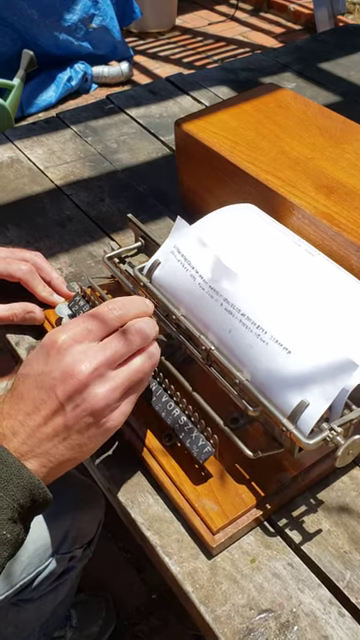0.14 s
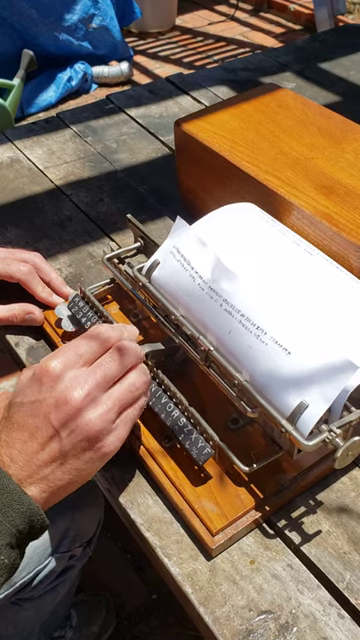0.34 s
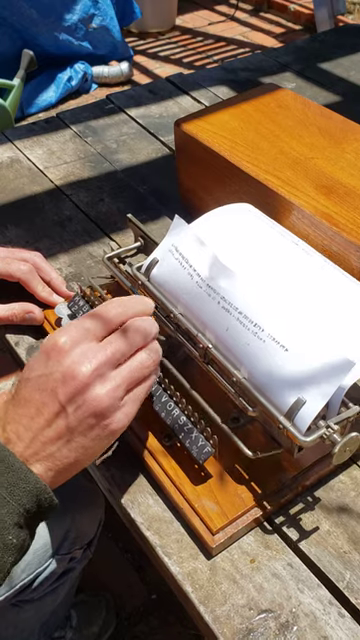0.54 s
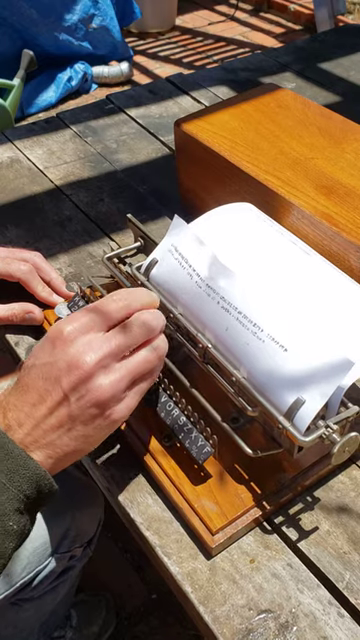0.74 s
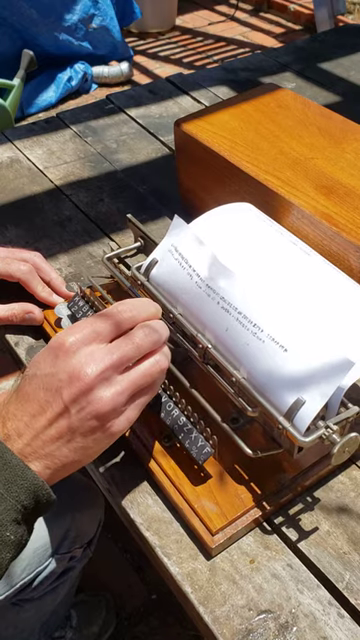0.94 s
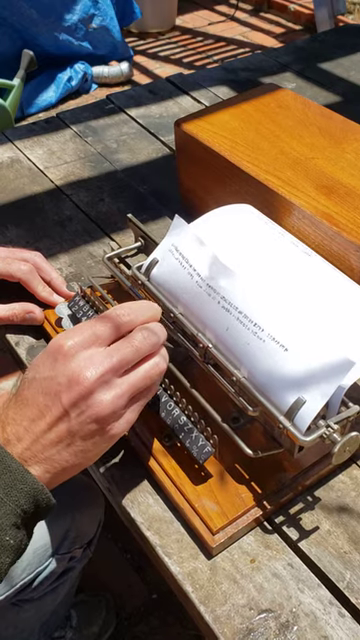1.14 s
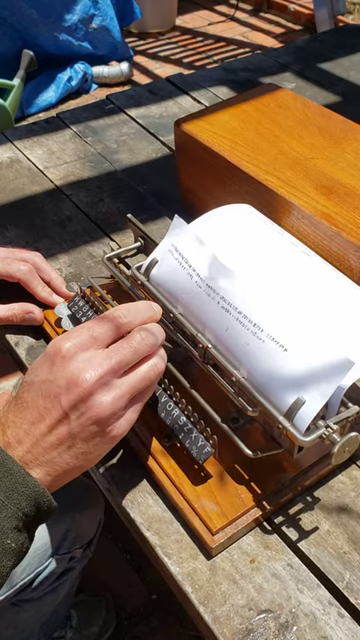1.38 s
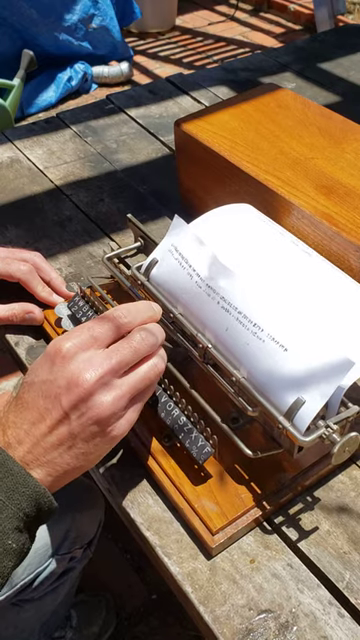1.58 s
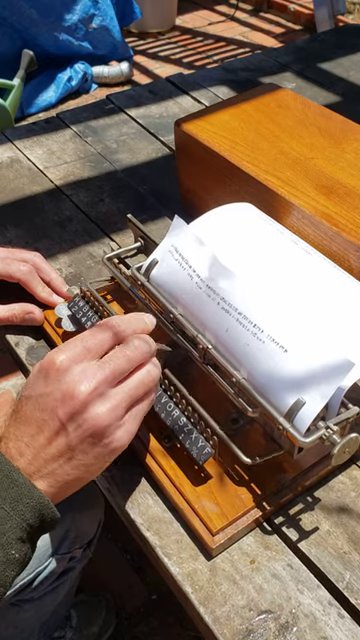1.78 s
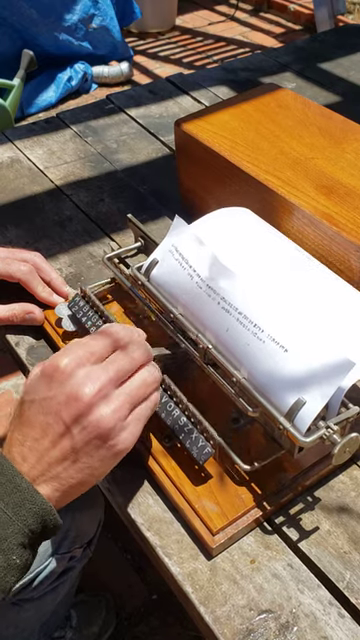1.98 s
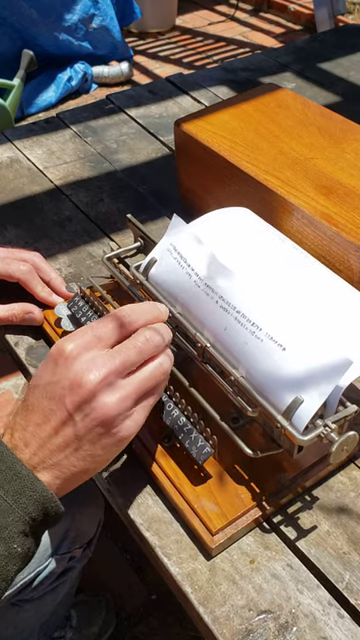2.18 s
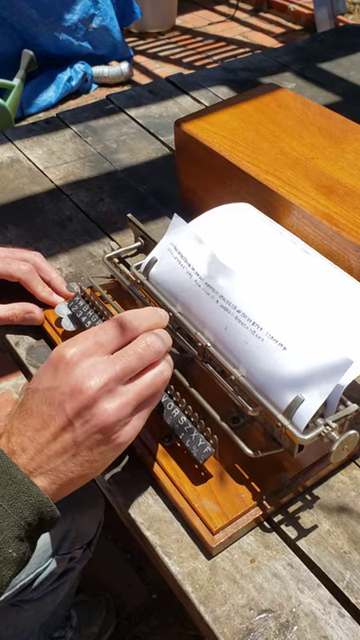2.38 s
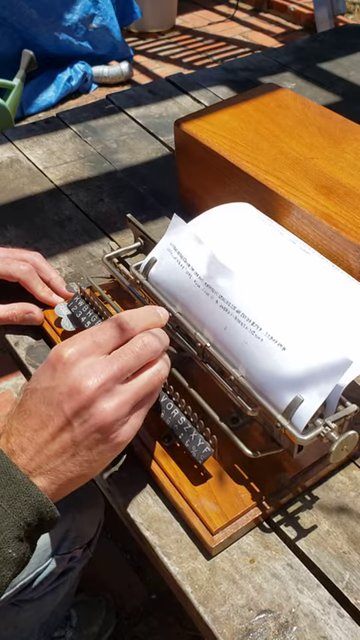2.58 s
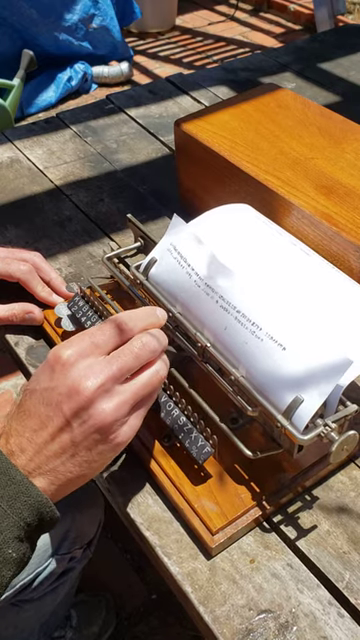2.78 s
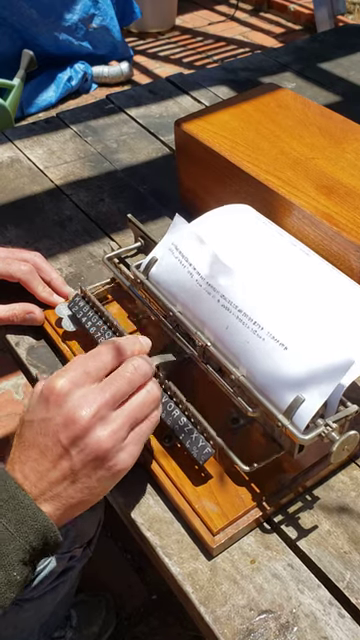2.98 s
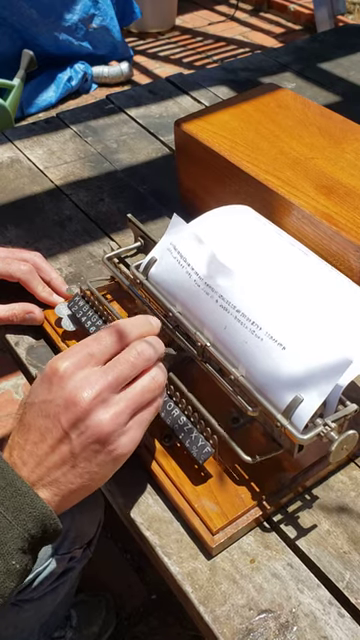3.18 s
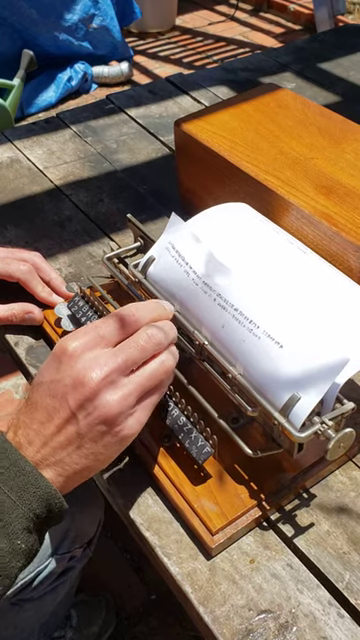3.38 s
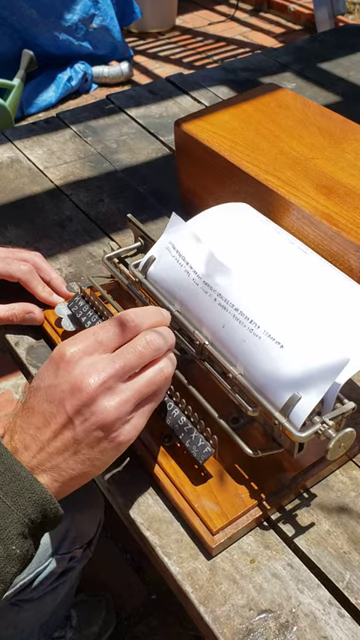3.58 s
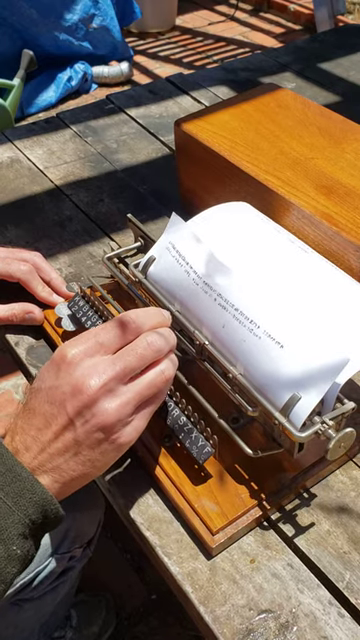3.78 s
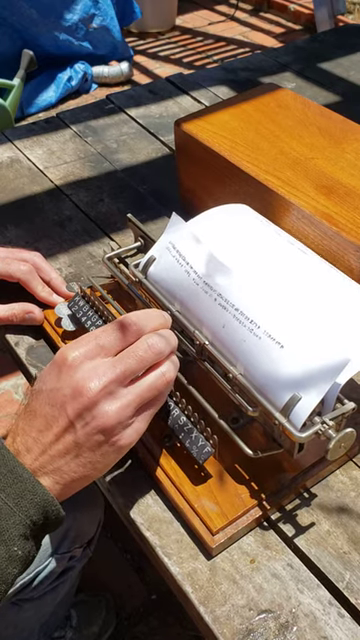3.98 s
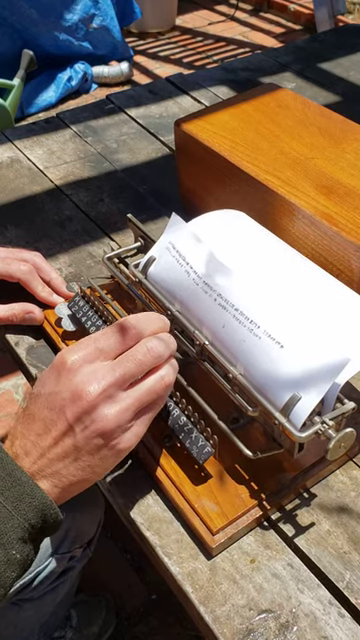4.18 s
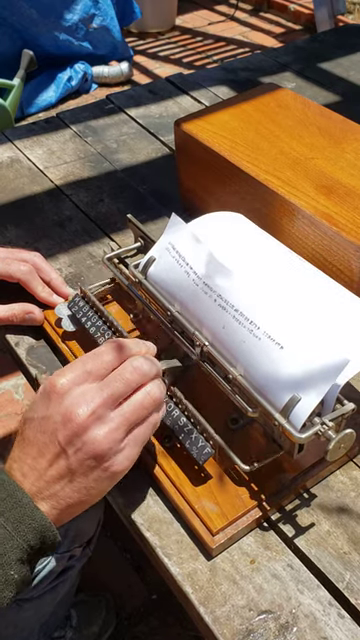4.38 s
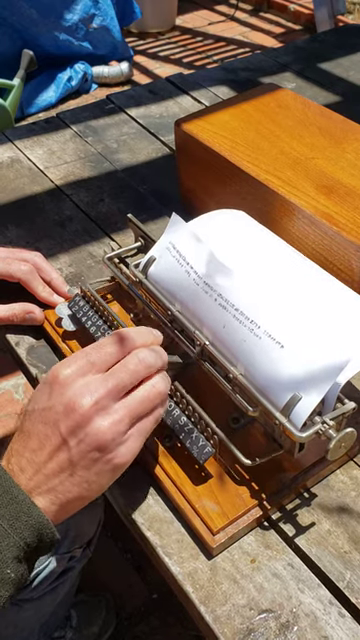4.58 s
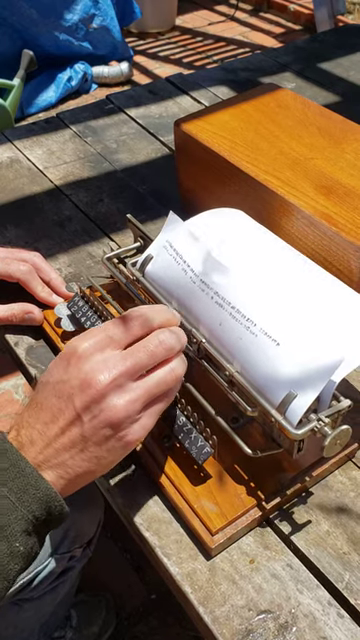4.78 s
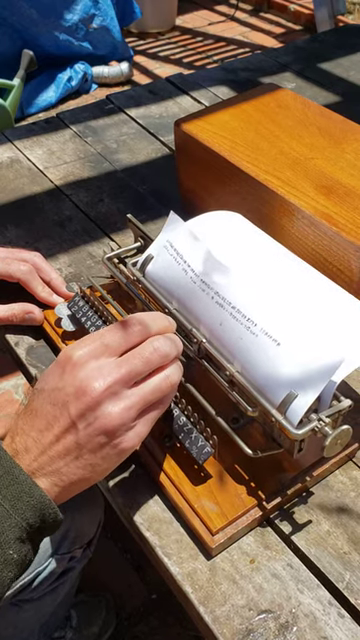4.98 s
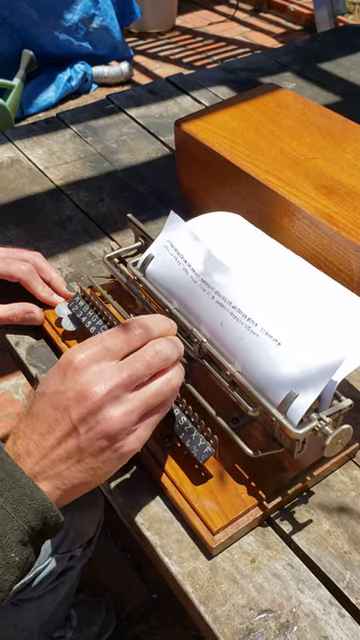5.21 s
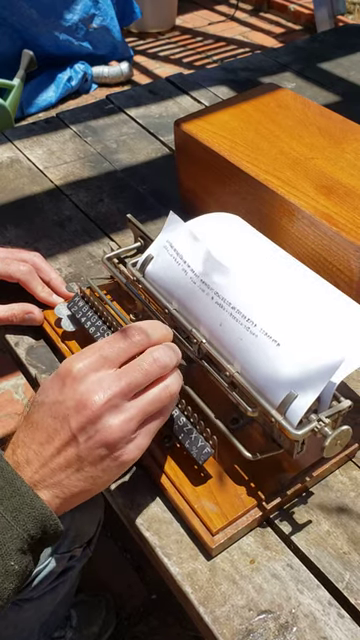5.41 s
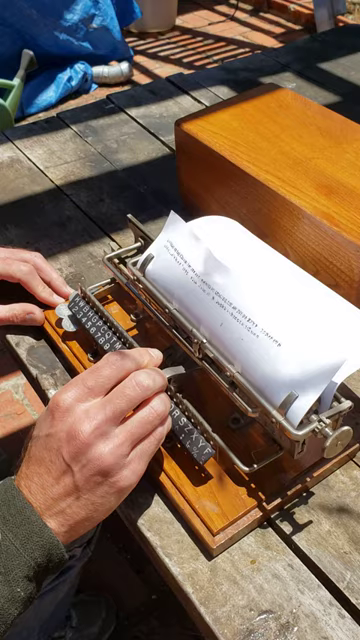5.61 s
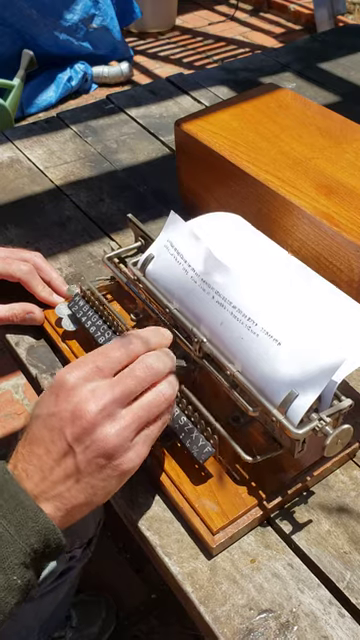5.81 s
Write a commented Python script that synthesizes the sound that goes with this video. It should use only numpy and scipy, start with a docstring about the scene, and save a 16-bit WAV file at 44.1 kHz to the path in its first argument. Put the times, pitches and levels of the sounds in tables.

```python
"""A faint tick, then the clack of an old index typewriter: five characters, typed on a wooden table
outdoors, close to a stereo pair. In each stroke the pointer finds its notch, the lever knocks in its
guide, the feed pawl catches, the type hits the platen and thumps the table, the carriage steps on and
the lever snaps back against its stop. A spring and a steel part ring on. Two faint squeaks follow the
first stroke; behind it all lie the rumble and hiss of open air and an engine far off."""
import sys
import numpy as np
from scipy import signal
from scipy.fft import rfft, irfft
from scipy.io import wavfile
from scipy.ndimage import uniform_filter1d

SR = 44100
rng = np.random.default_rng(int(sys.argv[2]) if len(sys.argv) > 2 else 0)


def output_pcm(signal):
    """Save a mono or channel-first signal as 16-bit PCM at the path in sys.argv[1].

    Samples are clipped to [-1, 1] before scaling.
    """
    pcm = np.clip(np.atleast_2d(signal).T, -1, 1) * 32767
    wavfile.write(sys.argv[1], SR, np.round(pcm).astype(np.int16))


N = 257984

# the pointer finds its notch: t/s, level/dB, brightness/(dB per octave)
POINTER_TICKS = [(0.1843, -53, -2.5), (0.613, -50, -2), (1.7022, -52, -2), (2.3795, -57, -4.5),
                 (2.8606, -45, 0.2), (4.2435, -48.5, -.5), (5.405, -47, 1.5)]
# the descending lever touches its guide: t/s, level/dB, length of the slide/s
LEVER_TOUCHES = [(0.2513, -48, 0.032), (2.9057, -55, 0.073), (4.266, -50.5, 0.088), (5.4624, -46, 0.034)]
# the lever knocks in its guide: t/s, level/dB
LEVER_KNOCKS = [(0.2884, -24), (1.8191, -30.5), (2.9634, -28.5), (4.3684, -31.5), (5.5636, -38)]
# the feed pawl drops over a tooth of the rack: t/s, level/dB
PAWL_CATCHES = [(0.2966, -21), (1.8381, -18.5), (2.9654, -21.5), (4.3804, -23.5), (5.5687, -25)]
# the type lands on the platen: t/s, level/dB, bounce gap/s, loss per bounce/dB, steel ring/dB
TYPE_BLOWS = [(0.3296, -17.5, 0.007, 6.5, -80.5), (1.8702, -18.5, 0.0063, 9.5, -84),
              (3.0045, -19.5, 0.0049, 10, -64), (4.4269, -19.5, .0076, 5, -72.5),
              (5.6132, -18.5, .008, 2.7, -87)]
# the carriage steps on: t/s, click/dB, scrape of the rising lever/dB
CARRIAGE_STEPS = [(.468, -25, -32), (2.015, -26, -34), (3.141, -28.5, -42.5), (4.5759, -25, -31.5),
                  (5.7551, -29, -35)]
# the lever hits its stop: t/s, level/dB, length/s, brightness/(dB per octave), spring ring/dB
LEVER_SNAPS = [(0.5129, -11, .0036, 0.5, -63), (2.0599, -10, 0.0034, 0, -59),
               (3.1973, -13, 0.0038, 0.6, -68.5), (4.6280, -15, 0.0049, 1.2, -70.5),
               (5.8170, -14, 0.0034, 0.2, -75.5)]
# faint squeaks: t/s, length/s, f/Hz, width of the waver/Hz, level/dB
SQUEAKS = [(0.902, 0.08, 10330, 90, -69), (1.384, 0.083, 2760, 260, -76)]

# colour of each contact, and of the wooden base and table: f/Hz, gain/dB
GUIDE_TONE = [(100, -6), (500, -4), (850, 1.5), (1130, 5.5), (1450, -3.5), (2200, -6), (2820, 5),
              (3400, -1), (4500, -6.5), (7000, -7.5), (10000, -17.5), (12500, -14.5), (16000, -17.5)]
CATCH_TONE = [(100, -10), (400, -3), (550, -5), (1200, -3.5), (2000, -7), (2650, -2.5), (3150, 5.5),
              (3500, -1.5), (4700, 1.5), (7000, -3), (10000, -5.5), (11500, 2.5), (16000, -1.5)]
PLATEN_TONE = [(100, 3.5), (420, -1.5), (600, -8), (820, 5), (1900, 1.5), (2900, 9.5), (4200, 3),
               (6500, -1.5), (9000, -6.5), (12000, -1.5), (16000, -7.5)]
SCRAPE_TONE = [(100, 0), (420, -7.5), (620, 5.5), (1100, -6.5), (1700, -5), (2000, -6.5), (3500, -2.5),
               (6500, -13), (10000, -11.5), (11500, -10), (16000, -17)]
STOP_TONE = [(100, -13.5), (500, -18.5), (950, -9.5), (1400, -0.5), (1850, 0), (2450, 13.5), (2750, 12.5),
             (3120, 15), (3450, 10), (4200, 7.5), (5700, 1), (7500, 4.5), (8700, -4), (11500, 4),
             (16000, 1.5)]
WOOD_TONE = [(25, -22), (50, -4.5), (110, 6), (200, 1), (255, -11), (313, 1.5), (355, -7), (408, -0.5),
             (490, -8), (658, -3), (720, -11.5), (798, -6.5), (1000, -15), (2200, -22.5), (6000, -52)]
# resonances of the metal frame: f/Hz, width/Hz, gain/dB
FRAME_MODES = [(1070, 290, 3), (1330, 32, 2.5), (1670, 180, 5), (2025, 37, 7.5), (2340, 52, -4.5),
               (2765, 600, 5.5), (3080, 160, -0.5), (3920, 54, 5), (4430, 80, 1.5), (5070, 120, 3.5),
               (6770, 130, 3), (11646, 470, 2.5), (13590, 210, 5), (14500, 180, 4), (15600, 290, 3)]
# long-ringing parts: f/Hz, spread of partials to either side/Hz, gain/dB, t60/s
SPRING_MODES = [(6000, 160, 1.5, 0.98), (6060, 260, -4.5, 1), (2820, 170, -3.5, .22)]
STEEL_MODES = [(3488, 0, 0, 3.3), (1620, 0, -15, 2.5)]
# decay of the machine and its surroundings: f/Hz, t60/s
TAIL_T60 = [(200, 0.43), (1200, 0.39), (3000, 0.27), (7000, .28), (15000, 0.27)]
# colour of the rattle and the reflections: f/Hz, gain/dB
TAIL_TONE = [(300, 1.5), (1300, 3.5), (2800, -6), (4500, 1), (8000, 0), (15000, -7.5)]

# the machine sits nearer the left microphone: f/Hz, left minus right/dB
MIC_BALANCE = [(60, 5), (250, 2), (600, 6.5), (1300, 7), (2600, 5.5), (4400, 5), (8000, 4), (14000, 7)]
# the right microphone hears it later: f/Hz, lag/samples
MIC_LAG = [(900, 3.9), (2700, 1.7), (4400, 2.7), (12000, 2.5)]
# likeness of left and right, for the machine and for the open air: f/Hz, coherence (0 to 1)
MIC_COHERENCE = [(100, 0.97), (900, 0.8), (2700, 0.72), (5000, 0.39), (9000, 0.48), (15000, .75)]
AIR_COHERENCE = [(60, .84), (180, .9), (550, .67), (1650, .1), (15000, .03)]
# spectrum of the open air: f/Hz, relative density/dB
AIR_SPECTRUM = [(20, -33), (45, -4.5), (82, -2), (200, -15.5), (290, -21.5), (380, -24), (700, -34),
                (1250, -42), (1600, -40.5), (2000, -45.5), (3500, -50.5), (6500, -53), (8700, -63),
                (14000, -57)]
# the background swells: t/s, rumble/dB, tilt/dB (half lifts the hiss, half lowers the air's rumble)
AIR_SWELL = [(0, -5, 3), (.6, -.5, 6), (1.6, -2.5, 3), (2.4, -3, 1.3), (4.1, -2.5, -1), (4.5, 1.5, 4.5),
             (5.3, -0.5, 0.5), (5.85, 7.5, 13)]


def typewriter(rattle_db=-13, rattle_t60=0.065, tail_db=-18, crossfeed=0.51):
    """Five strokes at close range, with the short rattle of loose parts and the longer ring around them."""
    direct = pointer() + lever_down() + pawl() + platen() + carriage() + lever_stop()
    out = direct + amp(rattle_db) * tail(direct, [(1000, rattle_t60)], rise_s=0.0009)
    out += amp(tail_db) * tail(direct + crossfeed * direct[::-1], TAIL_T60, rise_s=0.0051)
    for s, *_, steel_db in TYPE_BLOWS:
        out += ringing(STEEL_MODES, s, steel_db, rise_s=0.18)
    for s, *_, spring_db in LEVER_SNAPS:
        out += ringing(SPRING_MODES, s, spring_db, rise_s=0.003)
    return out + table_thump()


def pointer(length_s=0.0027):
    """The pointer ticks into the notch of the next character."""
    out = np.zeros((2, N))
    for s, db, bright in POINTER_TICKS:
        add(out, s, contact(db, length_s, CATCH_TONE, bright, shape=1.1, grit=0.4))
    return out


def lever_down(touch_s=0.006, knock_s=0.0083):
    """The descending lever touches its guide, rubs along it and knocks against it."""
    out = lever_rub()
    for s, db, _ in LEVER_TOUCHES:
        add(out, s, contact(db, touch_s, GUIDE_TONE, bright=-3.6, shape=1.1, grit=0.55))
    for s, db in LEVER_KNOCKS:
        add(out, s, contact(db, knock_s, GUIDE_TONE, bright=0.8, shape=0.67, grit=0.54))
    return out


def lever_rub(db=-63.5, slips_per_s=1100, uneven_db=3, size=4096):
    """Tiny irregular slips tap the guide while the lever slides."""
    hz, out = np.fft.rfftfreq(size, 1 / SR), np.zeros((2, N))
    guide = irfft(mic_pair(np.array([[1], [0]]) * causal(curve(GUIDE_TONE, hz)), hz))
    for s, _, length in LEVER_TOUCHES:
        chance, strength = rng.random(size * 2), rng.standard_normal(size * 2)
        slips = (chance < slips_per_s / SR) * amp(uneven_db * strength) * np.sign(strength)
        slide = unit_rms(slips[:round(length * SR)])
        add(out, s, amp(db) * signal.fftconvolve(slide[None], guide, axes=1))
    return out


def pawl(catch_s=0.0045, drag_s=0.018, drag_after_s=0.029, drag_db=-20):
    """The feed pawl drops over a tooth, then drags dully along the rack."""
    out = np.zeros((2, N))
    for s, db in PAWL_CATCHES:
        add(out, s, contact(db, catch_s, CATCH_TONE, bright=-0.6, shape=0.75, grit=0.18))
        drag = contact(db + drag_db, drag_s, CATCH_TONE, bright=-8, shape=1.0, grit=0.2)
        add(out, s + drag_after_s, drag)
    return out


def platen(blow_s=0.0035, bounces=7, bounce_s=0.0024, first_bounce_db=-3.5, jitter_s=0.0008):
    """The type lands and bounces at nearly even gaps, dying away with slightly uneven force."""
    out = np.zeros((2, N))
    for s, db, gap, loss_db, _ in TYPE_BLOWS:
        add(out, s, contact(db, blow_s, PLATEN_TONE, bright=-0.87, shape=0.55, grit=0.3))
        for k, (jitter, uneven) in enumerate(rng.uniform(-0.92, 1, (bounces, 2))):
            bounce_db = db + first_bounce_db - k * loss_db + 0.5 * uneven
            bounce = contact(bounce_db, bounce_s, PLATEN_TONE, bright=2.8, shape=0.83, grit=0.25)
            add(out, s + (k + 1) * gap + jitter * jitter_s, bounce)
    return out


def carriage(lift_s=0.011, lead_s=0.008, click_s=0.0014, slide_s=0.0115, lag_s=0.0108, slide_db=-8.5):
    """The rising lever scrapes, the carriage lets go with a click and slides on by one place."""
    out = np.zeros((2, N))
    for s, db, lift_db in CARRIAGE_STEPS:
        lift = contact(lift_db, lift_s, SCRAPE_TONE, bright=1, shape=0.63, grit=0.44)
        click = contact(db, click_s, SCRAPE_TONE, bright=-1.2, shape=0.73, grit=0.3)
        slide = contact(db + slide_db, slide_s, SCRAPE_TONE, bright=0.45, shape=0.86, grit=0.44)
        add(out, s - lead_s, lift)
        add(out, s, click)
        add(out, s + lag_s, slide)
    return out


def lever_stop():
    """The lever snaps against its stop: the force stays up and then ends at once."""
    out = np.zeros((2, N))
    for s, db, length, bright, _ in LEVER_SNAPS:
        add(out, s, contact(db, length, STOP_TONE, bright, shape=5.5, grit=0.087))
    return out


def contact(db, length_s, tone, bright, shape, grit, size=4096):
    """Metal chatters on metal for a few milliseconds and rings the resonances of the frame."""
    t, hz = np.arange(size) / SR, np.fft.rfftfreq(size, 1 / SR)
    force = np.exp(-(t / length_s) ** shape)  # a low shape lingers, a high one cuts off
    slips = np.exp(grit * wander(size, 24))  # uneven stick and slip
    chatter = rfft(force * slips * rng.standard_normal((2, size)))
    power = uniform_filter1d(abs(chatter) ** 2, size=23, axis=1)
    # the chatter feeds all bands alike
    flat = np.array([unit_rms(side * causal(-10 * np.log10(p))) for side, p in zip(chatter, power)])
    frame_db = sum(gain / (1 + (2 * (hz - f) / width) ** 2) for f, width, gain in FRAME_MODES)
    tilt_db = bright * np.log2(np.maximum(hz, 500))  # bright is in dB per octave
    colour = causal(curve(tone, hz) + frame_db + tilt_db)
    fade = np.hanning(2 * size)[size:]
    return amp(db) * np.linalg.norm(force) * irfft(mic_pair(flat * colour, hz)) * fade


def table_thump(thump_db=-12, rise_s=0.0088, t60=0.23, size=16384):
    """Each blow shakes the wooden base and the planks under it."""
    t, hz, out = np.arange(size) / SR, np.fft.rfftfreq(size, 1 / SR), np.zeros((2, N))
    envelope = (1 - np.exp(-t / rise_s)) * amp(-60 * t / t60)
    wood = causal(curve(WOOD_TONE, hz))
    for s, db, *_ in TYPE_BLOWS:
        shake = rfft(envelope * rng.standard_normal((2, size)))
        add(out, s, amp(db + thump_db) * irfft(mic_pair(shake * wood, hz)))
    return out


def ringing(modes, s, db, rise_s, count=13):
    """Lightly damped modes build up and ring on; weaker partials on either side make a coil shimmer."""
    out, offsets = np.zeros((2, N)), np.linspace(-1, 1, count)
    for hz, spread, mode_db, t60 in modes:
        t = np.arange(round(min(t60, 2) * SR)) / SR
        partials = hz + spread * (offsets + rng.uniform(-0.24, 0.2, count))
        wave = sum(np.sin(2 * np.pi * f * t) / (1 + 9 * k ** 2) for f, k in zip(partials, offsets))
        envelope = (1 - np.exp(-t / rise_s)) * amp(db + mode_db - 60 * t / t60)
        add(out, s, unit_rms(wave) * envelope)
    return out * amp([[1.5], [-1.5]])  # louder at the left microphone


def tail(sound, t60s, rise_s, taps_per_s=12000, size=256):
    """Scattered reflections reach the microphones and die away, band by band, as t60s sets."""
    sparse = rng.choice([-1., 1.], (2, SR // 2)) * (rng.random((2, SR // 2)) < taps_per_s / SR)
    hz, t, bands = signal.stft(sparse, SR, nperseg=size)
    decay = amp(curve(TAIL_TONE, hz)[:, None] - 60 * t / curve(t60s, hz)[:, None])
    taps = signal.istft(bands * decay, SR, nperseg=size)[1]
    taps *= 1 - np.exp(-(np.arange(taps.shape[1]) / SR / rise_s) ** 2)
    taps /= np.linalg.norm(taps, axis=1, keepdims=True)
    return signal.fftconvolve(sound, taps, axes=1)[:, :N]


def squeaks():
    """Brief narrow whistles between the first two strokes, centred in the pair."""
    out = np.zeros((2, N))
    for s, length, hz, width, db in SQUEAKS:
        n = round(length * SR)
        whistle = sine(hz + width * wander(n, 100) / 2)
        add(out, s, amp(db) * unit_rms(np.hanning(n) * whistle))
    return out


def open_air(base_db=-47, patchy_db=1.42, size=4096):
    """Low rumble, much alike at both microphones, and a faint wide hiss; both swell and ebb."""
    framing = dict(nperseg=size, noverlap=size * 3 // 4)
    hz, t, bands = signal.stft(rng.standard_normal((2, N)), SR, **framing)
    bands[1] = cohere(bands, curve(AIR_COHERENCE, hz)[:, None])
    s, rumble_db, tilt_db = np.transpose(AIR_SWELL)
    low = curve([(200, 1), (700, 0)], hz)[:, None]  # 1 in the rumble, 0 in the hiss
    swell_db = low * np.interp(t, s, rumble_db) + (0.5 - low) * np.interp(t, s, tilt_db)
    patches = uniform_filter1d(rng.standard_normal(bands.shape[1:]), size=30, axis=0)
    patches = unit_rms(uniform_filter1d(patches, size=6, axis=1))
    bands *= unit_rms(amp(curve(AIR_SPECTRUM, hz)))[:, None] * amp(swell_db + patchy_db * patches)
    return amp(base_db) * signal.istft(bands, SR, **framing)[1][:, :N]


def far_engine(hz=62.6, base_db=-50.5, waver_hz=2.5, throb=0.3):
    """A distant engine hums, wavering in pitch and level and swelling with the rumble."""
    drift, load = wander(N, 6000), wander(N, 6000)
    hum = unit_rms(sine(hz + waver_hz * drift) * (1 + throb * load))
    s, rumble_db, _ = np.transpose(AIR_SWELL)
    return hum * amp(base_db + np.interp(np.arange(N) / SR, s, rumble_db))


def mic_pair(spectra, hz):
    """Two unrelated spectra become a close pair: the left microphone is nearer and louder."""
    lag = np.exp(-2j * np.pi * hz * curve(MIC_LAG, hz) / SR)
    right = cohere(spectra, curve(MIC_COHERENCE, hz)) * lag
    lean = amp(curve(MIC_BALANCE, hz))
    return np.array([spectra[0] * lean, right]) * np.sqrt(2 / (1 + lean ** 2))


def cohere(pair, coherence):
    """A right channel that shares part of the left."""
    return coherence * pair[0] + np.sqrt(1 - coherence ** 2) * pair[1]


def causal(db):
    """Minimum-phase response of unit power: it rings after the blow, never before."""
    log_gain = np.log(unit_rms(amp(db)))
    mirrored = np.r_[log_gain, log_gain[-2:0:-1]]
    return np.exp(np.conj(signal.hilbert(mirrored)))[:len(db)]


def curve(points, hz):
    """A table of (f/Hz, value) joined by lines on a log axis."""
    f, value = np.transpose(points)
    return np.interp(np.log(hz + 1), np.log(f + 1), value)


def add(mix, s, sound):
    """Lays a sound into the stereo mix at time s."""
    part = mix[:, max(round(s * SR), 0):][:, :sound.shape[-1]]
    part += sound[..., :part.shape[1]]


def wander(n, span):
    """Random drift of unit power, smoothed over span samples."""
    return unit_rms(uniform_filter1d(rng.standard_normal(n), size=span))


def sine(hz):
    return np.sin(2 * np.pi * np.cumsum(hz) / SR)


def amp(db):
    return 10 ** (np.asarray(db) / 20)


def unit_rms(x):
    return x / np.sqrt(np.mean(abs(x) ** 2) + 1e-20)


def scene():
    """The typewriter up close; open air and engine behind it, a little to the left."""
    return typewriter() + squeaks() + (open_air() + far_engine()) * amp([[1.2], [-1.2]])


def record(dry, edge_hz=16150):
    """The recorder rounds off the loudest peaks and cuts the highest treble."""
    lowpass = signal.firwin(301, edge_hz, window=("kaiser", 9), fs=SR)
    return signal.oaconvolve(np.tanh(dry), lowpass[None], "same")


dry = scene()
out = record(dry)
output_pcm(out)
```